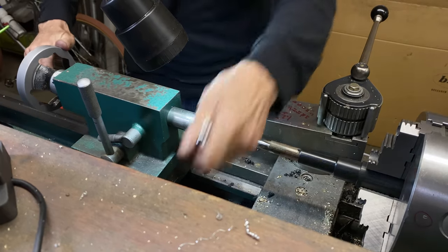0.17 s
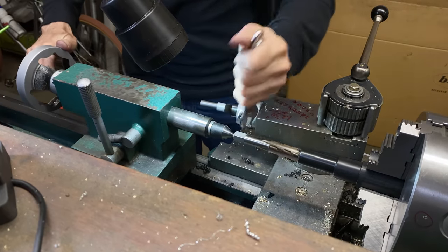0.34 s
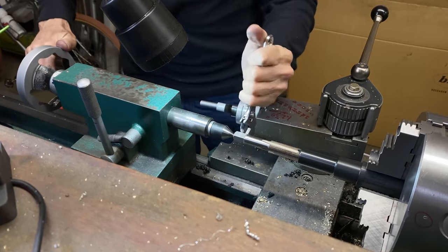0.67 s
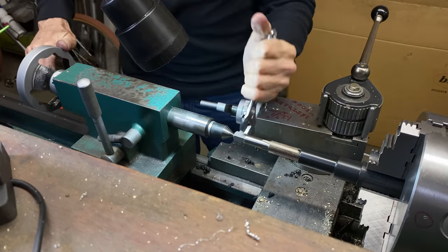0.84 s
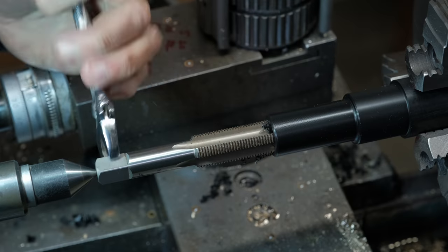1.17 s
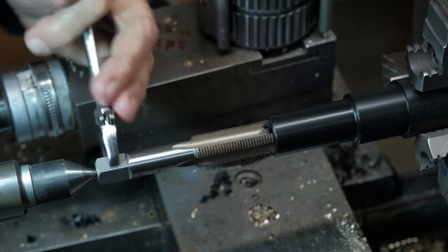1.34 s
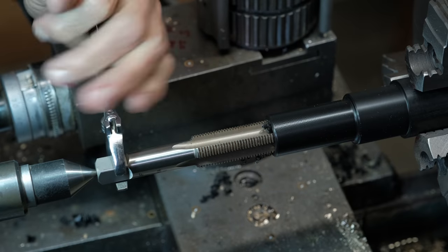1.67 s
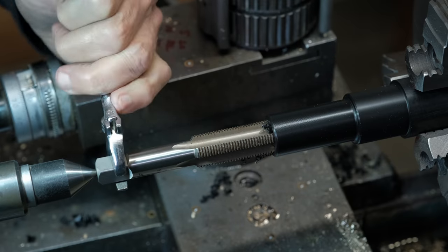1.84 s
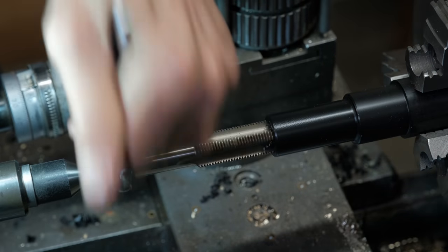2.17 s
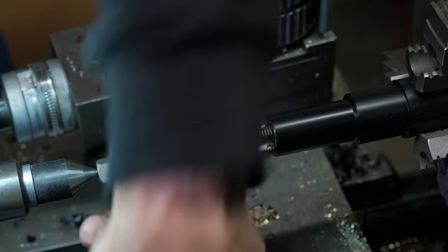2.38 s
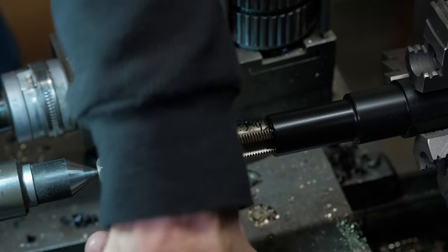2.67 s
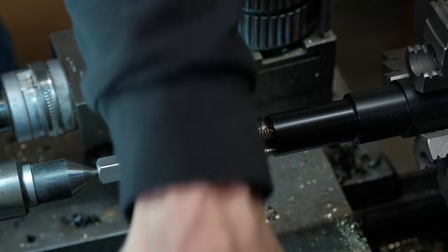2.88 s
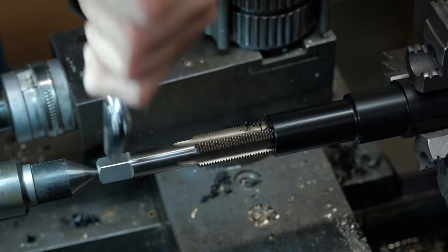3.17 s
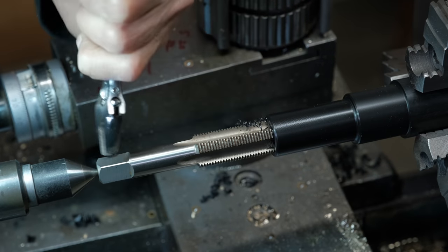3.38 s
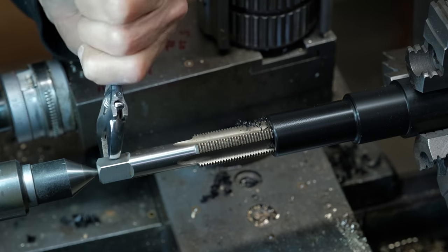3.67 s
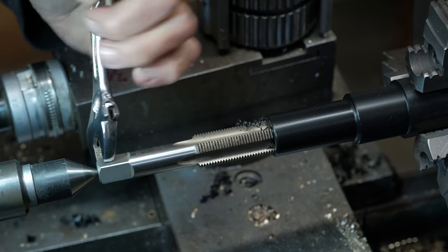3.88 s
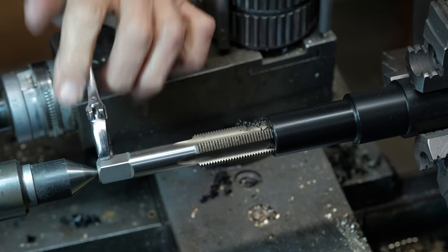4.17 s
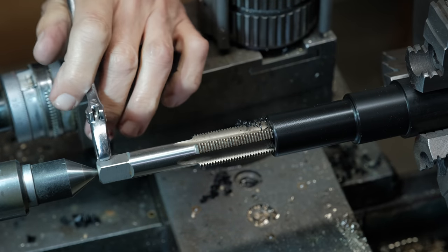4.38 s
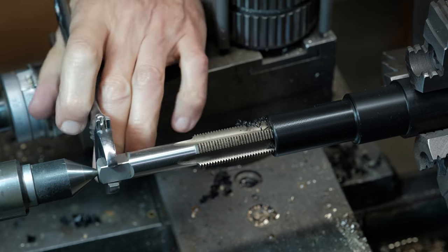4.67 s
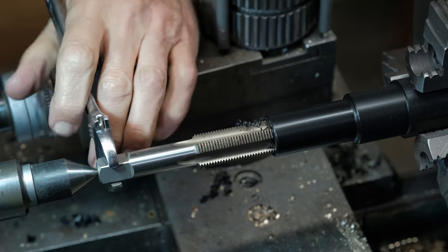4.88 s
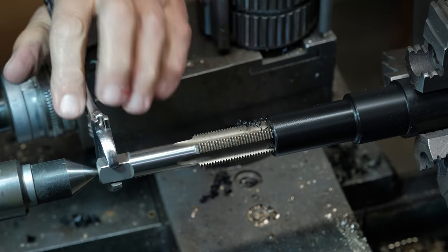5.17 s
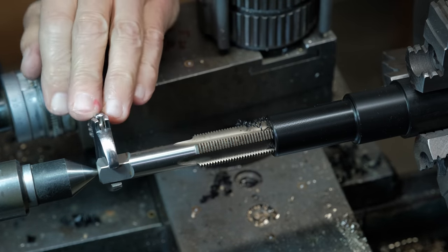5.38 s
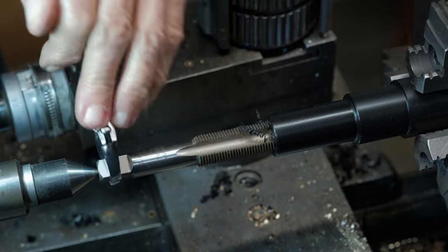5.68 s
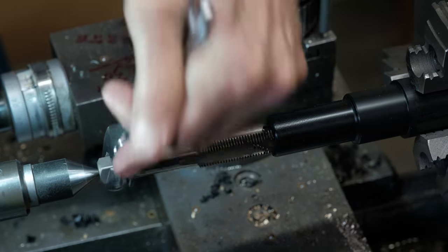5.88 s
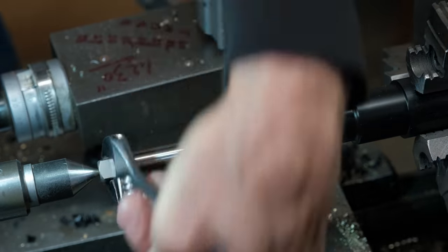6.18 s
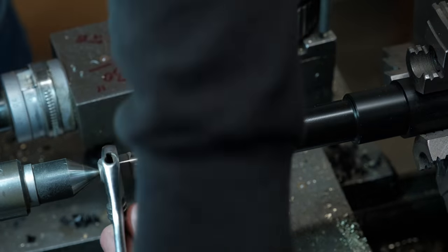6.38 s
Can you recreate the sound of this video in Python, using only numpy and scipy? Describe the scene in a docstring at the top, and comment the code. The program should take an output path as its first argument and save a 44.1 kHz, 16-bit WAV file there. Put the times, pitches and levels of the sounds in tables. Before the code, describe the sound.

A hand wrench rattles, snaps and knocks against a steel tap in a lathe, with faint sleeve rustle and quiet electrical hum beneath.

```python
"""A steel wrench turns a thread tap held in a stopped lathe: it is slid off, rattled and seated again on the tap's square.
Each contact is filtered noise and damped modes: a snap of the jaws, a ring of the wrench and a knock of the lathe,
whose sheet metal swells into a boom. Jolts make the jaws scrape; a wavering sine is the tap's one squeak.
Place: a small workshop with 120 Hz mains hum, rumble, air and hiss, where a sleeve swishes, the thread rubs
and a hand lands softly, all as shaped noise. One microphone hears the steel with a fainter answer from the room."""
import sys
import numpy as np
from scipy import signal
from scipy.fft import rfft, irfft, next_fast_len
from scipy.io import wavfile
from scipy.ndimage import map_coordinates

SR = 44100
rng = np.random.default_rng(int(sys.argv[2]) if len(sys.argv) > 2 else 0)


def waveform_to_disk(signal):
    """Save audio, clipped to [-1, 1], as 16-bit WAV at the path in sys.argv[1]."""
    frames = np.transpose(np.atleast_2d(signal))
    scaled = np.clip(frames, -1, 1) * 32767
    samples = np.round(scaled).astype(np.int16)
    wavfile.write(sys.argv[1], SR, samples)


N = 287973  # samples

# The steady place. Spectra, each row: frequency in Hz, relative density in dB per Hz.
RUMBLE_SPECTRUM = [(20, -40), (50, -14.5), (85, -2.5), (112, 5), (140, 3), (215, -14), (350, -7.5),
                   (550, -30.5), (900, -49)]
AIR_SPECTRUM = [(170, -14), (220, -6), (330, 3), (420, 2), (560, -5), (870, 0), (1050, -4), (1400, -7.5),
                (2000, -15), (4000, -31)]
# Sleeve cloth, also the colour of the faint hiss. Each row: frequency in Hz, relative density in dB per Hz.
SLEEVE_SPECTRUM = [(2000, -18), (3800, 1), (5200, -9.5), (7300, -3), (9500, -5.5), (11500, -9),
                   (13500, -20.5), (16000, -40.5)]
# The hum sinks once. One row: centre in seconds, length in seconds, change in dB.
HUM_LULL = (1.8, 0.49, -7.5)

# The arm's moves and the tap's turns. Each row: fastest moment in seconds, length in seconds, peak level in dB.
ARM_MOVES = [(.45, .8, -68), (1.33, 0.97, -64), (2.29, 0.35, -58), (2.88, 0.55, -60), (3.2, 0.6, -77),
             (3.76, .3, -54.5), (4.13, 0.05, -65), (4.225, 0.045, -63), (4.52, 0.56, -63),
             (4.94, 0.11, -58.5), (5.82, 0.35, -64.5), (6.24, 0.46, -62)]
TAP_TURNS = [(.62, 0.35, -58.5), (1.05, 0.35, -62.5), (2.23, 0.52, -57.5), (3.05, 0.32, -64),
             (3.84, 0.53, -57), (4.95, .14, -59), (5.78, 0.72, -65.5), (6.26, 0.35, -65)]
# The tap rubbing in its thread. Each row: frequency in Hz, relative density in dB per Hz.
THREAD_SPECTRUM = [(1200, -27.5), (2100, -18), (2620, -3.5), (2860, 2.5), (3100, -8.5), (4100, -14),
                   (5500, -30)]

# Vibrating steel parts. Each row: nominal mode frequency in Hz, relative level in dB, 60 dB decay in seconds.
LATHE_MODES = [(407.8, -7, 0.088), (620, -22.5, 0.037), (851.6, 3, 0.088), (935, -11, 0.042),
               (1087.4, -0.5, 0.14), (1294, -7.5, .13), (1423, -2.5, 0.078), (1607, -6, 0.025)]
WRENCH_MODES = [(2257, 1, 0.072), (2570, -5.5, 0.14), (2814, -4.5, 0.14), (2860, -5.5, 0.021),
                (3274, -14, 0.12), (3475, -8, 0.12), (4088, -1, 0.059), (4760, -26.5, 0.15)]
JAW_MODES = [(6725, 5.5, 0.062), (7870, 8.5, 0.09), (9080, -3.5, 0.051), (9000, -10.5, .04),
             (10490, -4, 0.087), (11100, -11.5, 0.026), (11700, -1.5, 0.019)]
SHEET_MODES = [(298.6, -1.5, 0.34), (320.8, -3, 0.37), (339.5, -3.5, .24)]
# Dense, quickly dying vibration of lathe, wrench and jaws.
# Each row: frequency in Hz, relative density in dB per Hz.
THUD_SPECTRUM = [(100, -39), (300, -10), (650, -9), (850, -4), (1450, -1), (1900, -14.5), (2600, -32.5),
                 (5000, -76.5)]
CLACK_SPECTRUM = [(900, -42), (1900, -19), (2500, 0), (2950, 2), (3700, -4), (4600, -9.5), (5600, -20.5),
                  (8000, -44.5)]
SNAP_SPECTRUM = [(3000, -47.5), (5200, -4.5), (7000, 0), (8500, 2.5), (11000, 2.5), (13000, -4.5),
                 (16000, -22)]
# Decay of the workshop's answer. Each row: frequency in Hz, 60 dB decay in seconds.
ROOM_DECAY = [(300, 0.83), (1000, 0.33), (3000, 0.32), (8000, 0.29), (15000, 0.11)]
# Wrench contacts. Each row: start in seconds, wrench clink, lathe knock and jaw snap in dB before each
# part's trim, nominal wrench pitch in Hz, nominal jaw pitch in Hz.
WRENCH_CONTACTS = [(0.133, -49.5, -57.5, -35, 2530, 8300), (0.177, -23, -47, -28.5, 2984, 8200),
                   (0.305, -44, -54, -40.5, 2900, 8100), (0.415, -45, -64, -60.5, 2780, 8030),
                   (0.479, -18.5, -26, -14.5, 2823, 10630), (0.68, -50, -41, -67, 2740, 7960),
                   (0.809, -17.5, -18, -26, 3360, 6640), (0.836, -14.5, -26, -14, 2753, 10780),
                   (1.044, -43.5, -32.5, -55, 2915, 7060), (1.2, -48, -40.5, -77, 2800, 7250),
                   (1.304, -37.5, -30.5, -44.5, 2870, 9140), (1.379, -38.5, -31, -57, 2854, 6730),
                   (1.398, -40.5, -27.5, -49, 3420, 9200), (1.461, -35.5, -27.5, -49.5, 2720, 6760),
                   (1.629, -46.5, -44, -74.5, 2720, 8500), (2.117, -20, -24, -21.5, 2795, 7190),
                   (2.236, -32.5, -42, -40.5, 2600, 7040), (2.648, -45.5, -51, -55.5, 2550, 8000),
                   (2.746, -20, -23, -29.5, 2900, 10000), (2.829, -26.5, -29, -34.5, 3145, 9900),
                   (2.844, -20.5, -28, -35, 2430, 8070), (2.851, -29.5, -47, -21, 2777, 9900),
                   (2.898, -34.5, -41, -39, 3470, 7200), (2.993, -45.5, -64.5, -31.5, 3040, 8000),
                   (3.093, -34.5, -41.5, -41, 2700, 6940), (3.187, -29, -67.5, -25.5, 3220, 10860),
                   (3.298, -45.5, -49, -63, 2540, 8160), (3.458, -15, -23.5, -25, 2580, 8900),
                   (3.603, -39, -47.5, -49, 2540, 8320), (3.615, -33.5, -49.5, -37, 2560, 8600),
                   (3.625, -42, -52.5, -29, 2516, 8650), (3.652, -14.5, -26.5, -10.5, 2876, 8490),
                   (3.789, -14.5, -14.5, -17.5, 3233, 6690), (4.01, -54.5, -45, -71, 2690, 7940),
                   (4.324, -37.5, -32, -58, 2750, 8140), (4.691, -37, -45, -44, 2880, 8300),
                   (4.82, -41.5, -46.5, -50.5, 2360, 10000), (4.965, -48, -47, -57.5, 2570, 8000),
                   (5.091, -29.5, -35, -31.5, 2444, 7120), (5.168, -40.5, -47, -48.5, 2570, 7000),
                   (5.219, -23.5, -29.5, -33.5, 2804, 8400), (5.228, -27.5, -36, -32, 2383, 7080),
                   (5.71, -57, -66.5, -53, 2860, 9900), (5.913, -44, -42.5, -48.5, 2500, 6550),
                   (5.945, -36.5, -38, -61, 2340, 7870), (6.303, -50.5, -72.5, -57, 3600, 7060)]

# Jaws sliding on the square. Each row: start in seconds, length in seconds, lathe groan, gritty rasp and
# sheet boom in dB before each part's trim.
JAW_SCRAPES = [(1.181, 0.073, -37.5, -50, -42), (1.37, 0.086, -35.5, -46, -41),
               (2.737, .095, -33.5, -33, -43.5), (2.837, 0.008, -31.5, -26.5, -48),
               (3.452, 0.067, -35.5, -36, -36.5), (3.65, 0.051, -49.5, -42, -34.5),
               (4.608, 0.082, -34.5, -43, -43), (5.856, 0.0145, -42, -45, -41)]
# How the lathe and the wrench colour a scrape. Each row: frequency in Hz, relative density in dB per Hz.
GROAN_SPECTRUM = [(150, -30.5), (300, -0.5), (600, -1), (860, 2), (1400, -0.5), (1900, -22), (3000, -39.5)]
RASP_SPECTRUM = [(1200, -23.5), (1900, -9.5), (2550, 7), (3400, -2.5), (4800, -11.5), (6000, -19),
                 (8500, -14.5), (11000, -19), (15000, -38.5)]
# Level of the squeak, straight lines between rows. Each row: time in seconds, level in dB.
SQUEAK_LEVEL = [(5.168, -71), (5.173, -35.5), (5.182, -30.5), (5.198, -38.5), (5.212, -53), (5.225, -51.5)]
# The palm meets the handle. Each row: start in seconds, level in dB before the trim.
PALM_BUMPS = [(5.87, -46), (5.915, -37.5), (5.947, -34.5), (6.012, -38.5)]
# Colour of the palm's thump. Each row: frequency in Hz, relative density in dB per Hz.
PALM_SPECTRUM = [(90, -14.5), (220, 6), (400, 5.5), (650, -9), (1200, -33)]

HISS_DB, AIR_DB, HUM_DB, RUMBLE_DB = -71, -60.5, -53, -52.5  # the workshop, before waver and lull
MURMUR_DB = 4.5  # the lathe's low murmur re the thread's rubbing
CHIPS_PER_S, CHIPS_DB = 34, 1.5  # chips catch in the turning thread; level re its rubbing
BOOM_DB, BOOM_DRAG_DB = -18, 8.5  # sheet boom re the untrimmed knock; extra per unit of drag above 1
SLIPS_PER_S = 1400
SCRAPE_RISE, SCRAPE_RELEASE_S = 0.23, 0.012  # share of a stroke over which pressure builds; its release
TOP_HZ = 16200  # band limit at the microphone


def amp(db):
    """Amplitude factor of a level in dB."""
    return 10 ** (np.asarray(db) / 20)


def unit(x):
    """Scaled to rms 1."""
    return x / np.sqrt(np.mean(x ** 2) + 1e-20)


def burst(x):
    """Scaled to the energy of 10 ms at rms 1."""
    return x / np.linalg.norm(x) * np.sqrt(0.01 * SR)


def along(points, hz):
    """Values between (Hz, value) points, read along a log axis."""
    f, v = np.transpose(points)
    return np.interp(np.log(hz + 1), np.log(f), v)


def wobble(rate):
    """A smooth random curve, rate knots a second."""
    knots = rng.standard_normal(int(N * rate / SR) + 4)
    return map_coordinates(knots, [np.arange(N) * rate / SR])


def coloured(x, spectrum):
    """x through a causal minimum-phase filter with this spectrum, built by folding its cepstrum."""
    m = 2 * next_fast_len(len(x))
    cepstrum = irfft(np.log(amp(along(spectrum, np.fft.rfftfreq(m, 1 / SR)))))
    cepstrum[1:m // 2] *= 2
    cepstrum[m // 2 + 1:] = 0
    return irfft(rfft(x, m) * np.exp(rfft(cepstrum)))[:len(x)]


def noise(spectrum):
    """Steady coloured noise of rms 1."""
    return unit(coloured(rng.standard_normal(N), spectrum))


def swell(s, length):
    """A smooth rise and fall around time s, like the speed of a hand."""
    return np.exp(-np.pi * ((np.arange(N) / SR - s) / length * np.sqrt(2)) ** 2)


def workshop(hum_hz=120, waver_db=1.77):
    """Faint hiss, the room's air, rumble and a mains hum; hum and rumble waver together."""
    phase = 2 * np.pi * hum_hz * np.arange(N) / SR
    mains = unit(np.sin(phase + 0.23 * wobble(8.8)))
    s, length, lull_db = HUM_LULL
    lull = lull_db * swell(s, length)
    level = amp(waver_db * wobble(7) + lull)
    hum = level * (amp(HUM_DB) * mains + amp(RUMBLE_DB) * noise(RUMBLE_SPECTRUM))
    air = amp(AIR_DB + 0.5 * lull) * noise(AIR_SPECTRUM)  # the air sinks half as far in dB
    return hum + air + amp(HISS_DB) * noise(SLEEVE_SPECTRUM)


def swells(rows):
    """The summed gain of (s, length s, dB) gestures."""
    return sum(amp(db) * swell(s, length) for s, length, db in rows)


def jolts(rate, clump_db):
    """Random impulses of either sign, rate a second on average, that come in louder and softer clumps."""
    kicks = (rng.random(N) < rate / SR) * rng.choice([-1, 1], N)
    return unit(kicks * amp(clump_db * np.tanh(wobble(170))))


def ring(modes, scatter_db=1.0, detune=0.008):
    """Damped modes; grip and point of contact shift their strength and pitch."""
    t = np.arange(SR // 2) / SR
    total = np.zeros(len(t))
    for hz, db, t60 in modes:
        strength, shift, phase = rng.standard_normal(3)
        decay = amp(db + scatter_db * strength - 60 * t / t60)
        total += decay * np.sin(2 * np.pi * hz * (1 + detune * shift) * t + np.pi * phase)
    return burst(total)


def handwork():
    """The sleeve swishes as the arm moves; the turning tap rubs in its thread, murmurs and crushes chips."""
    swish = swells(ARM_MOVES) * unit(noise(SLEEVE_SPECTRUM) * amp(wobble(500)))
    steel = ring(LATHE_MODES) + amp(-8) * ring(WRENCH_MODES)
    chips = unit(signal.fftconvolve(jolts(CHIPS_PER_S, clump_db=5), steel)[:N])
    rubbing = unit(noise(THREAD_SPECTRUM) * amp(1.5 * wobble(150)))
    murmur = amp(MURMUR_DB) * noise(AIR_SPECTRUM)
    return swish + swells(TAP_TURNS) * (rubbing + murmur + amp(CHIPS_DB) * chips)


def add(track, s, x):
    """Mix x into the track from time s."""
    part = track[max(round(s * SR), 0):][:len(x)]
    part += x[:len(part)]


def ting(hz, t60):
    """The mode that the point of contact favours: a close pair, since the steel is not round."""
    return ring([(hz * 0.988, 0, t60), (hz * 1.012, 0, t60)], scatter_db=1.0, detune=0.014)


def struck(modes, spectrum, t60, ring_db, attack):
    """One part's answer to a blow: a brief chattering crack and its ringing modes."""
    t = np.arange(SR // 2) / SR
    chatter = amp(3 * np.interp(t, np.arange(0, 1, 0.001), rng.standard_normal(1000)))
    crack = rng.standard_normal(len(t)) * chatter * amp(-60 * t / t60)
    crack = burst(coloured(crack, spectrum))
    return burst((crack + amp(ring_db) * ring(modes)) * (1 - np.exp(-t / attack)))


def room_tail():
    """A fresh workshop tail of noise, each frequency dying at its own speed."""
    hz, t, z = signal.stft(rng.standard_normal(SR // 2), SR, nperseg=256)
    decay = amp(-60 * t / along(ROOM_DECAY, hz)[:, None])
    build_up = 1 - np.exp(-t / 0.0036)
    return signal.istft(z * decay * build_up, SR, nperseg=256)[1][:SR // 2]


def in_room(x, wet_db):
    """The direct sound x with the workshop's answer, wet_db setting the answer's level."""
    tail = room_tail()
    return x + amp(wet_db) * signal.fftconvolve(x, tail / np.linalg.norm(tail))[:len(x)]


def wash(spectrum):
    """The room gathers a crack from all directions, so its answer is smooth in colour."""
    return burst(coloured(room_tail(), spectrum))


def contacts():
    """Steel meets steel: jaws snap, the wrench rings, the lathe knocks, its sheet metal swells into a boom."""
    out, t = np.zeros(N), np.arange(SR // 2) / SR
    for s, clink_db, knock_db, snap_db, wrench_hz, jaw_hz in WRENCH_CONTACTS:
        whole_db = 10 * np.log10(np.sum(amp([clink_db, knock_db, snap_db]) ** 2))
        softness_db = whole_db - snap_db
        drag = 1.5 + np.clip((softness_db - 13) / 14, 0, 1.5)  # dull contacts slide home, so they last longer
        loose = np.clip((whole_db - knock_db - 17) / 8, 0, 1)  # clear of the lathe, it rings more purely
        dulling_db = -1.3 * np.clip(softness_db - 0.5, 0, 7)  # a softer contact loses its highest treble

        lathe = struck(LATHE_MODES, THUD_SPECTRUM, t60=0.076, ring_db=1.5, attack=0.0012 * drag)
        lathe = in_room(lathe, wet_db=-17) + amp(-9.5) * wash(THUD_SPECTRUM)
        knock = amp(knock_db - 4) * lathe

        wrench = struck(WRENCH_MODES, CLACK_SPECTRUM, t60=0.029 * drag, ring_db=-13.5, attack=0.00067 * drag)
        wrench = burst(wrench + amp(-0.5 + 10 * loose) * ting(wrench_hz, t60=0.027))
        wrench = in_room(wrench, wet_db=-16) + amp(-15 - 7 * loose) * wash(CLACK_SPECTRUM)
        clink = amp(clink_db - 5.5) * wrench

        jaws = struck(JAW_MODES, SNAP_SPECTRUM, t60=0.021 * drag, ring_db=-11, attack=0.00035)
        jaws = burst(jaws + amp(-1.5) * ting(jaw_hz, t60=0.022))
        jaws = in_room(jaws, wet_db=-20) + amp(-16) * wash(SNAP_SPECTRUM)
        snap = amp(snap_db - 6) * coloured(jaws, [(7500, 0), (13000, dulling_db)])

        sheet = burst(ring(SHEET_MODES) * (1 - np.exp(-t / 0.031)) ** 2)  # slow to build up
        boom = amp(knock_db + BOOM_DB + BOOM_DRAG_DB * (drag - 1)) * sheet
        add(out, s, knock + clink + snap + boom)
    return out


def stroke(start, length):
    """Pressure on the jaws: attack, hold, release."""
    t = np.arange(N) / SR - start
    attack = np.clip(t / (SCRAPE_RISE * length), 0, 1)
    return attack * np.exp(-np.maximum(t - length, 0) / SCRAPE_RELEASE_S)


def scrapes():
    """The jaws stick and slip on the square: clumped jolts groan in the lathe, rasp in the wrench, shake the sheet."""
    groan, rasp, boom = sum(amp(levels)[:, None] * stroke(start, length)
                            for start, length, *levels in JAW_SCRAPES)
    slips = jolts(SLIPS_PER_S, clump_db=6)
    impulse = np.eye(1, SR // 2)[0]
    lathe = burst(coloured(impulse, GROAN_SPECTRUM)) + amp(2) * ring(LATHE_MODES)
    wrench = burst(coloured(impulse, RASP_SPECTRUM)) + amp(-6) * ring(WRENCH_MODES)

    def shaken(part, force):
        """A part's response to the slips under this force."""
        return signal.fftconvolve(slips * force, part / np.linalg.norm(part))[:N]

    steel = amp(-4) * shaken(lathe, groan) + amp(-3.5) * shaken(wrench, rasp)
    sheet = amp(1.5) * shaken(ring(SHEET_MODES), boom)
    return in_room(steel + sheet, wet_db=-10.5)


def squeak(hz=1080):
    """The tap grips for a moment and sings, a little hoarsely, near one of the lathe's modes."""
    pitch = hz * (1 + 0.05 * wobble(200))
    tone = np.sin(2 * np.pi * np.cumsum(pitch) / SR)
    tone = unit(tone * amp(3.4 * wobble(250)))
    s, db = np.transpose(SQUEAK_LEVEL)
    level = amp(np.interp(np.arange(N) / SR, s, db, left=-120, right=-120))
    return in_room(level * tone, wet_db=-9.5)


def bumps():
    """A soft hand lands on the wrench: a low thump of filtered noise with no ring."""
    out, t = np.zeros(N), np.arange(SR // 2) / SR
    for s, db in PALM_BUMPS:
        push = rng.standard_normal(len(t)) * amp(-60 * t / 0.14) * (1 - np.exp(-t / 0.0046))
        add(out, s, amp(db - 3) * burst(coloured(push, PALM_SPECTRUM)))
    return out


def scene():
    """All sources at one microphone."""
    return (workshop() + handwork() + contacts() + scrapes() + squeak() + bumps())[None]


def record(dry):
    """The microphone's signal keeps nothing at or above its band limit."""
    m = next_fast_len(N + SR // 2)
    passed = np.fft.rfftfreq(m, 1 / SR) < TOP_HZ
    return irfft(rfft(dry, m) * passed, m)[:, :N]


dry = scene()
out = record(dry)
waveform_to_disk(out)
```